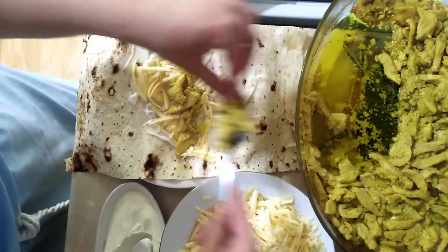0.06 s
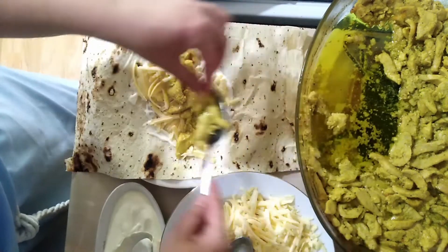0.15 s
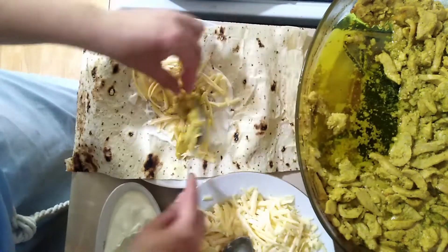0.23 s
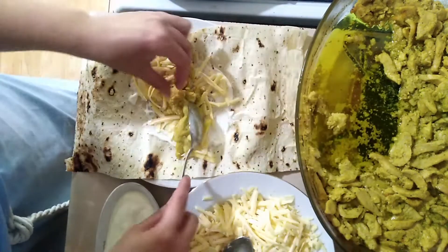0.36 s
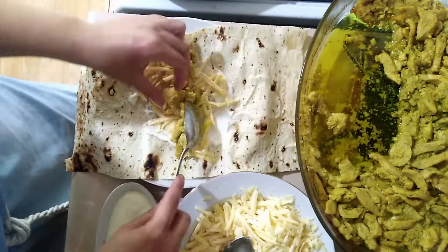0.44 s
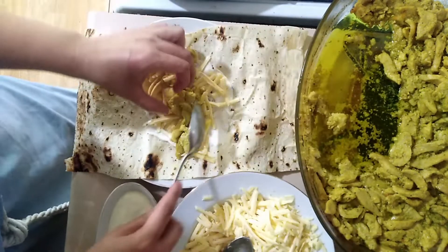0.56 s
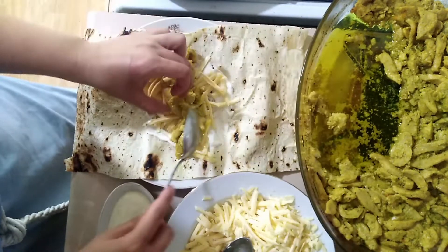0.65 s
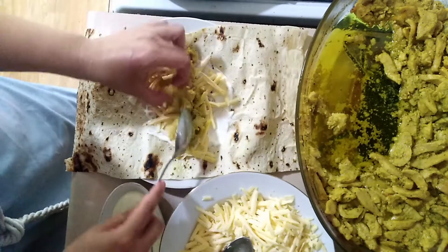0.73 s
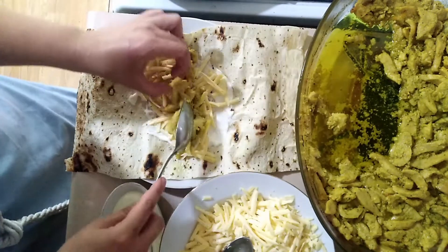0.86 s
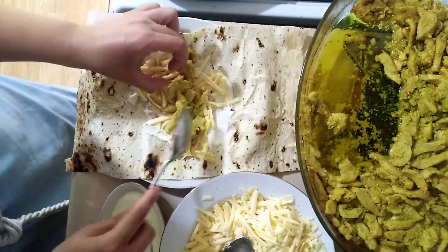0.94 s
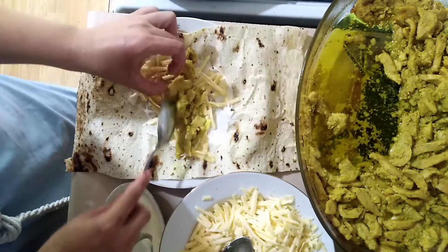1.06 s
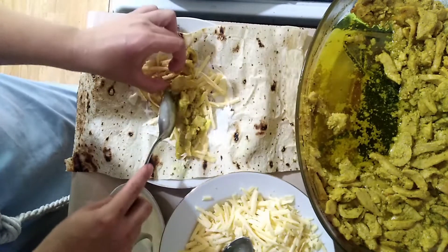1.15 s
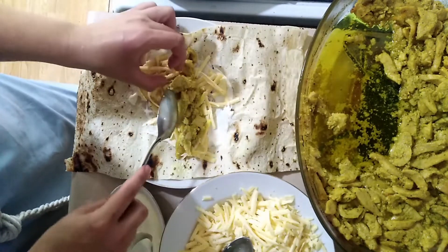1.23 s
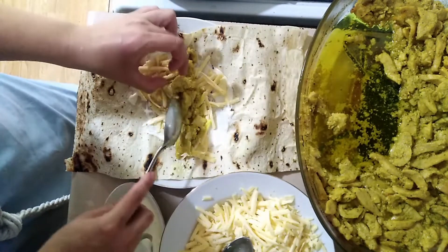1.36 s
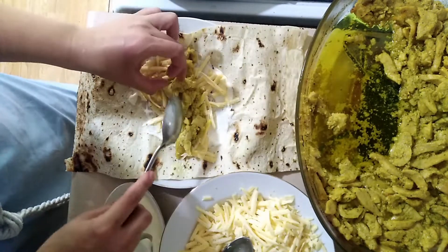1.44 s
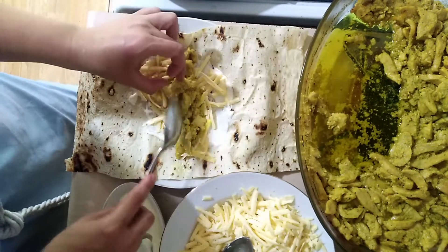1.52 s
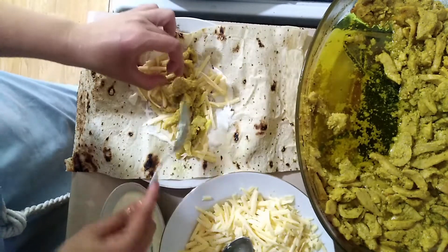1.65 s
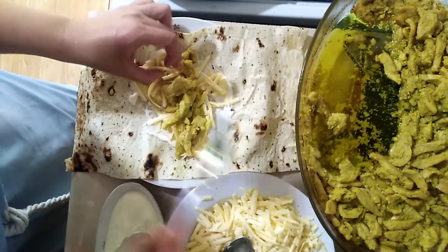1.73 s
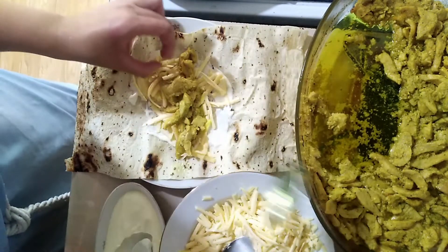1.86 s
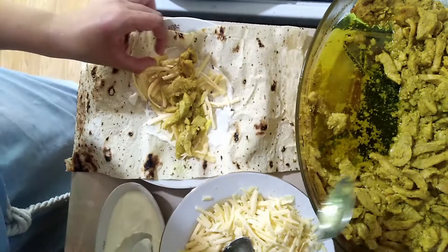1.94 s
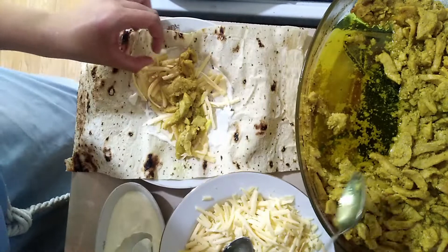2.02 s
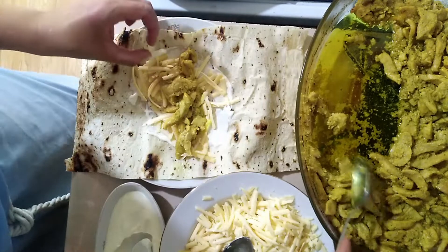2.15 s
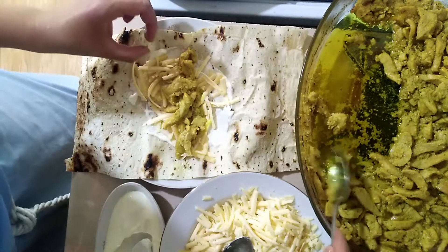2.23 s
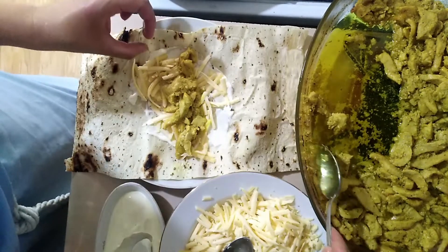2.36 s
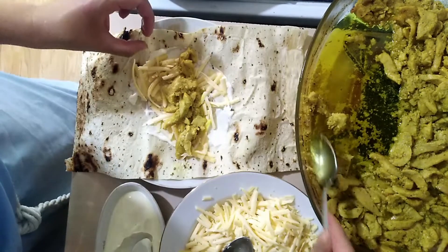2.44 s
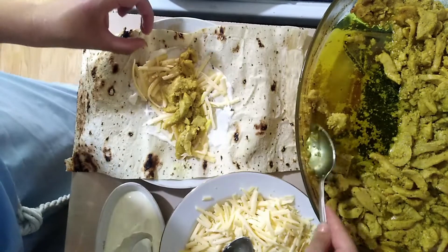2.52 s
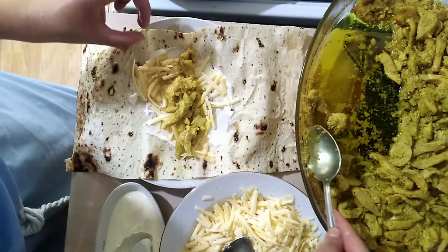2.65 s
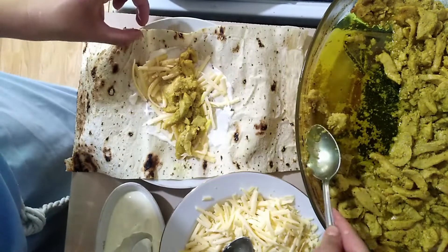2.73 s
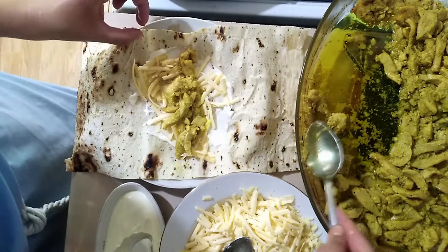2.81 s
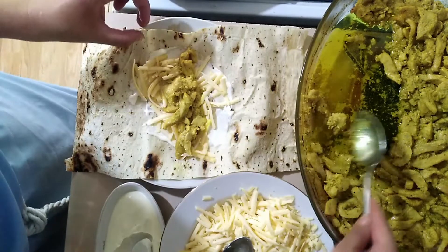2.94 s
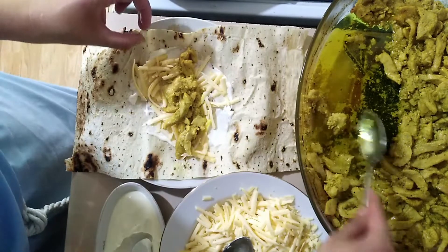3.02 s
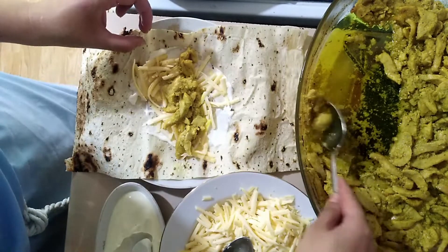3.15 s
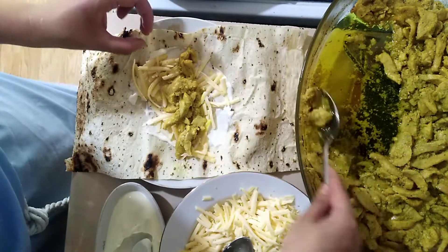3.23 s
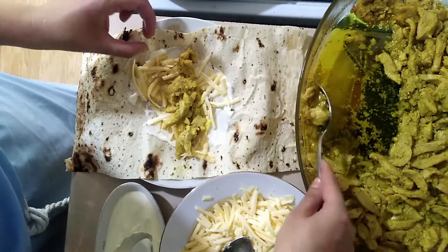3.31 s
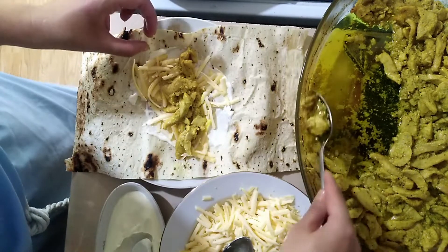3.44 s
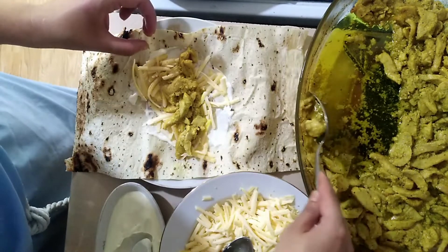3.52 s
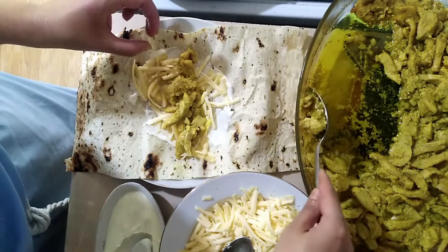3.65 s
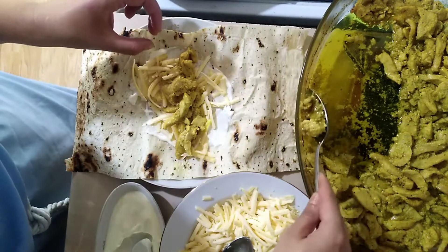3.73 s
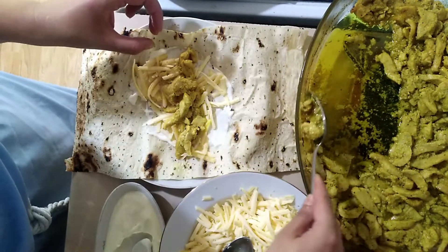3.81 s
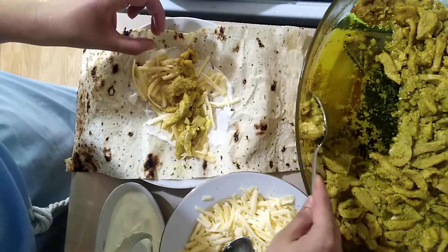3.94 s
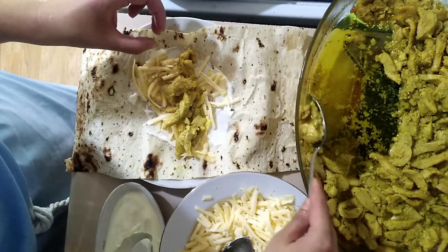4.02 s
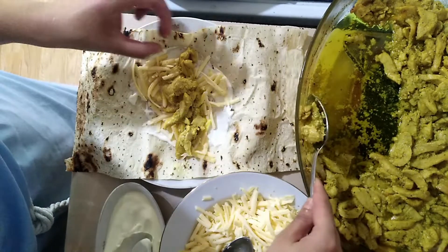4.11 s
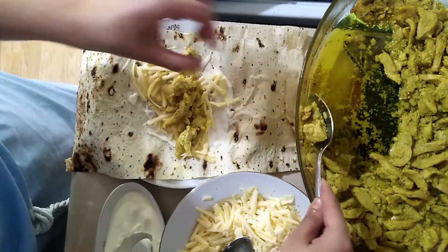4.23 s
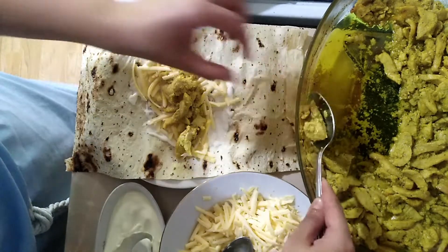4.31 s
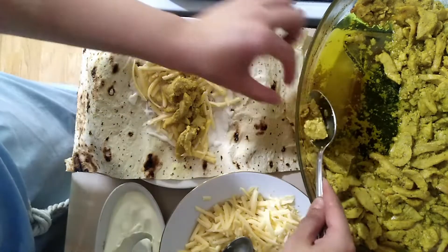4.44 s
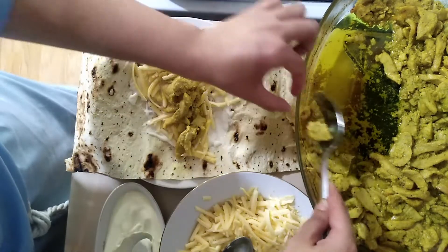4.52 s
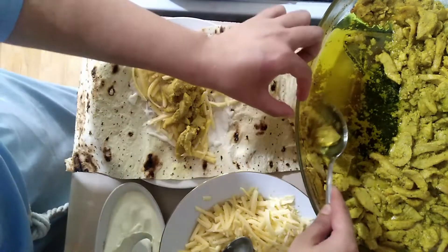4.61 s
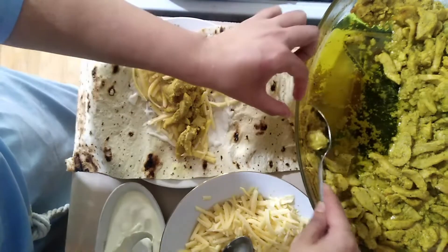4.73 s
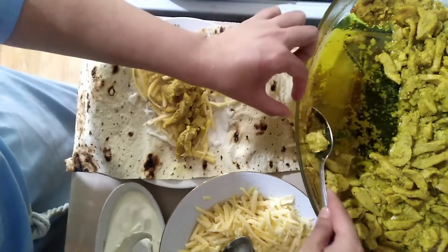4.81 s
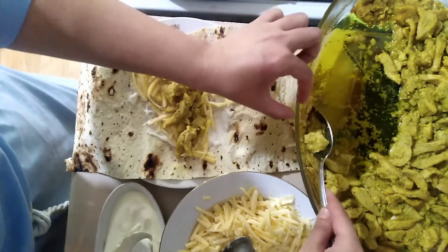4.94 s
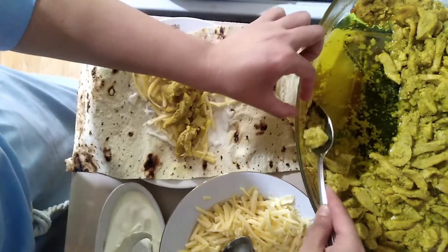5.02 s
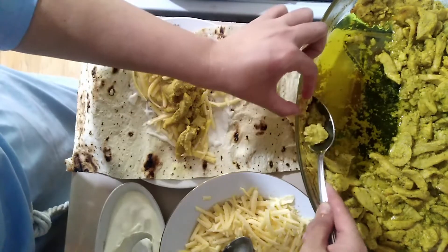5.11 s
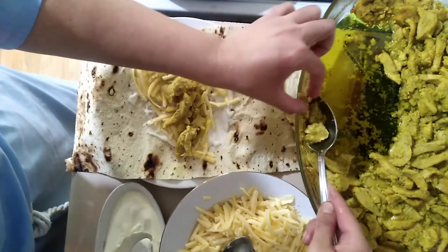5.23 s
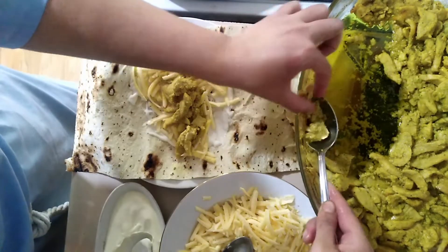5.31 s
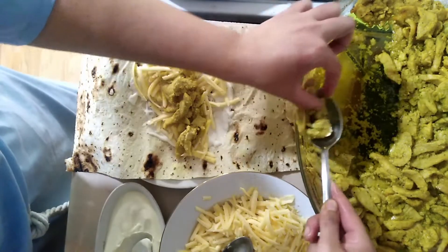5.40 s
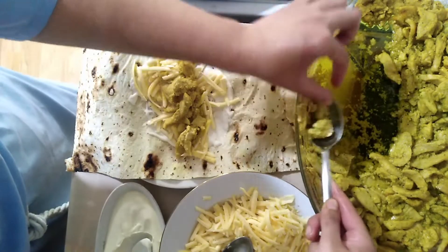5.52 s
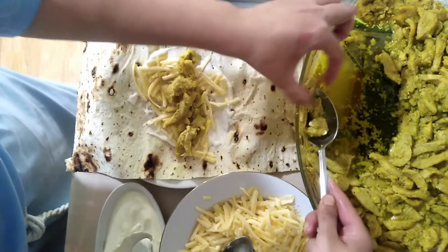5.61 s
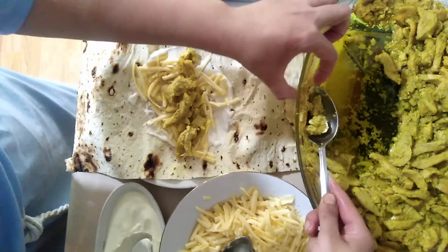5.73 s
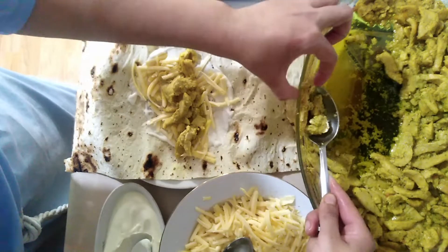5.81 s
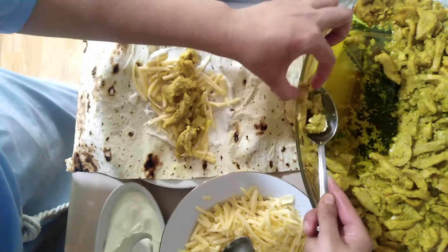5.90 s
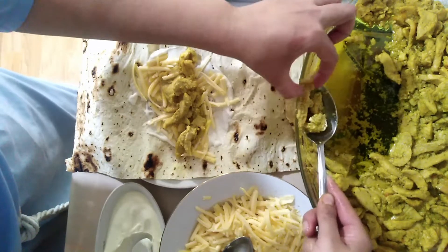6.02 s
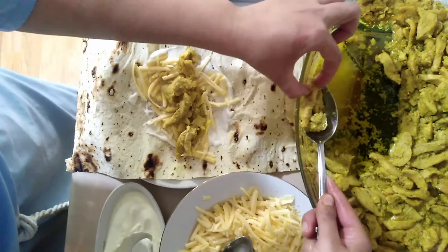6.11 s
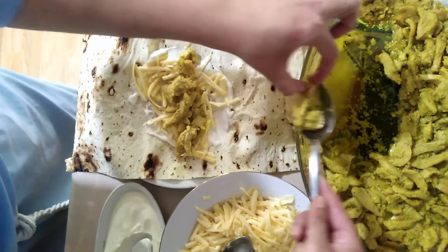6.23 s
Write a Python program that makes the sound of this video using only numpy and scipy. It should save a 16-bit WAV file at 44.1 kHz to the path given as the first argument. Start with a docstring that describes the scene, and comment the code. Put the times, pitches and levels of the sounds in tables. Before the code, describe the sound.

A close stereo scene in a small, lightly reverberant kitchen. A low, slightly fluttering appliance hum continues throughout with hollow airy drone, faint hiss and a thin high whine that comes and goes. From about 0.2 s moist filling is pressed onto flatbread: a soft bump, then wet squelches and smacks, strongest near 0.6 s with two sticky snaps, and gentler ones at 1.2 and 1.7-1.8 s. Fine wet crackle persists. At 2.5 s a steel spoon clinks clearly on a large glass bowl, ringing briefly; at 3.0 s comes a brighter, shorter clink with more spoon ring. A low bump and faint moist scooping follow from 3.3 to 4.2 s. At 4.7 s there is a dull, food-muffled contact, then at 5.0 s a dry dull tick and soft squelch. A firm clink with a thud lands at 5.5 s, and faint bumps and a muffled touch end it around 5.8 s.

```python
"""Small kitchen: a steel spoon takes filling from a large glass bowl and spreads it on flatbread.
Three clear clinks and three fainter, duller contacts ring bowl and spoon modes over a short noise clack.
Moist handling is enveloped noise: squelches, smacks, snaps and crackle, with soft bumps on the table.
An appliance hums behind in coloured noise, with a thin, wavering narrow-band whine.
Decaying octave bands of noise form the room's reverberation."""
import sys
import numpy as np
from scipy import signal
from scipy.fft import rfft, irfft, next_fast_len
from scipy.io import wavfile

SR = 44100
rng = np.random.default_rng(int(sys.argv[2]) if len(sys.argv) > 2 else 0)


def log_audio(samples):
    """Write samples as a 16-bit WAV file to the path given in sys.argv[1]."""
    # one column per channel
    frames = np.atleast_2d(samples).T
    # limit to full scale, then quantise
    limited = np.clip(frames, -1, 1)
    pcm = np.round(limited * 32767).astype(np.int16)
    wavfile.write(sys.argv[1], SR, pcm)


N = 276066
AGE_S = np.arange(SR * 3 // 5) / SR   # time since onset of an event

# appliance rumble: centre_hz, level_db_per_hz
RUMBLE = [(20, -109), (32, -104), (55, -88), (85, -83), (115, -75), (145, -75.5), (180, -86), (250, -97.5),
          (400, -118), (700, -132)]
RUMBLE_SIDE_DB, RUMBLE_LEFT_DB = -12.5, -1.7
RUMBLE_FLUTTER_DB, RUMBLE_FLUTTER_HZ = 1.7, 8.3
# air-flow resonances: centre_hz, width_hz, level_db_per_hz, left_minus_right_db, flutter_db, flutter_hz
AIR_DRONE = [(205.2, 55, -83, 12, 3.5, 11), (297.6, 20, -85, 2.5, 2.5, 5), (382, 160, -101.5, -17.5, 8, 5),
             (629.3, 58, -94, 21.5, 5, 17), (880, 35, -106, -14.5, 1, 3.1), (1101, 61, -90.5, 11, 5, 20),
             (1210, 66, -87.5, -8, 4, 12), (1379, 110, -90, -13.5, 5, 12),
             (1527.8, 77.4, -80.5, -27.5, 2, 15), (1638, 47, -87.5, -2.5, 2.5, 15),
             (1670, 120, -101, -4.5, 3, 4.1)]
# faint treble noise in bands of uneven level: columns as AIR_DRONE
TREBLE_BANDS = [(3230, 45, -114, -8.5, 4, 3), (4880, 960, -117, -1, 4.4, 11), (5770, 270, -115, 0, 5, 3),
                (7560, 220, -118, -4, 7.3, 2.4), (12800, 230, -127, -8, 4, 3)]
# even hiss: centre_hz, level_db_per_hz
HISS = [(200, -118), (900, -119), (1400, -110), (1950, -121), (2700, -121), (4200, -121.5), (6400, -127),
        (8500, -131.5), (14000, -134)]
# whine level before flutter: time_s, level_db
WHINE_LEVEL = [(0.0, -79), (0.5, -80.5), (0.88, -92), (1.06, -74), (1.5, -89.5), (1.78, -64.5), (2.3, -72),
               (2.9, -68.5), (3.45, -77.5), (3.8, -65), (4.25, -79.5), (4.8, -84.5), (5.1, -77), (5.8, -75),
               (6.26, -74.5)]
WHINE_HZ, WHINE_WIDTH_HZ = 4684, 95
WHINE_FLUTTER_DB, WHINE_FLUTTER_HZ = 4, 6.3

# kitchen reverberation: centre_hz, t60_s, level_db
ROOM = [(150, 1, -10.5), (507, .45, -9.5), (980, 0.47, -14), (2000, 0.41, -15.5), (3790, 0.47, -14),
        (8030, 0.41, -13.5), (14000, 0.09, -7.5)]
ROOM_RISE_S = 0.02
CUTOFF_HZ = 14500

# soft bumps on the table: start_s, level_db, centre_hz
THUDS = [(0.233, -44, 123), (3.250, -42, 111), (5.125, -43.5, 87), (5.522, -37.5, 127), (5.715, -43, 80)]
THUD_HALF_WIDTH_OCTAVES, THUD_RISE_S, THUD_T60_S = 0.3, 0.0055, 0.15

# crackle of moist food
SQUISH_PER_S, SQUISH_DB, SQUISH_SPREAD_DB = 24, -69.5, 6.5
SQUISH_WIDTH_HZ, SQUISH_RISE_S, SQUISH_T60_S = 260, 0.004, 0.06

# moist food pressed or lifted: start_s, squelch_db, smack_db, smack_hz, t60_s, left_minus_right_db
PRESSES = [(0.187, -51, -51.5, 2860, 0.33, 4), (0.546, -51, -56, 3760, 0.69, 8),
           (0.617, -41.5, -53, 2710, 0.38, 0), (0.746, -73, -55.5, 3950, 0.11, -2),
           (1.196, -54.5, -78, 3620, 0.37, -5), (1.660, -78, -58, 3540, .22, -14),
           (1.823, -53.5, -77, 3140, .2, -2), (3.464, -70, -65, 4340, 0.25, -8),
           (3.766, -75.5, -65, 2780, 0.16, -6), (4.195, -57.5, -63, 2960, 0.39, 7),
           (4.851, -60, -70, 3030, 0.07, 2), (5.110, -57, -68.5, 2470, 0.47, 3)]
# squelch colour, relative: centre_hz, level_db_per_hz
SQUELCH_COLOUR = [(150, -12), (400, -9.5), (640, -2), (850, -10.5), (1080, 1), (1400, -9), (1900, -27),
                  (5000, -60)]
SMACK_HALF_WIDTH_OCTAVES = 0.21
SQUELCH_RISE_PER_T60, SMACK_RISE_PER_T60 = 0.035, 0.041
GRAIN_DB, GRAIN_HZ = 2.5, 72

# wet spoon snaps free of the filling: start_s, level_db
SNAPS = [(0.545, -54), (0.616, -48.5)]
SNAP_HZ, SNAP_HALF_WIDTH_OCTAVES, SNAP_LEFT_DB = 4840, 0.36, 8
SNAP_RISE_S, SNAP_T60_S = 0.00078, 0.12

# fingertip nudges the spoon, two dead resonances: centre_hz, level_db, left_minus_right_db
FLICK = [(1440, -32, -3), (2630, -37.5, 0)]
FLICK_START_S, FLICK_HALF_WIDTH_OCTAVES = 4.962, 0.16
FLICK_RISE_S, FLICK_T60_S = 0.0039, 0.059

# spoon on glass: start_s, wall_place (0-2, beyond 2 acts as 2), bowl_db, spoon_db, clack_db, clack_t60_s,
# contact_cutoff_hz, left_minus_right_db (clack and clusters), contact_s, food_db_per_octave
CLINKS = [(2.4583, 0.0, 3, -33.5, -27.5, 0.2, 6360, 1.5, 0.0005, 0),
          (3.009, 0.65, 0.5, 3, -16.5, 0.074, 11100, 1, 0.00034, 0),
          (4.687, 1.92, -15.5, -17.5, -51.5, 0.24, 600, -9, 0.0009, 11.5),
          (4.960, 0.24, -16.5, -44, -54, 0.1, 2570, -26, 0.0074, 2.5),
          (5.5198, 2.0, 4, -19, -17, 0.086, 4500, 0, 0.0017, 0),
          (5.828, 2.5, -26.5, -65.5, -82, 0.11, 4040, -26, 0.0076, 2)]
# glass bowl modes: pitch_hz
BOWL_HZ = [442, 951, 1426, 1944, 2508, 3165, 3845, 4603, 5493, 5655, 6398, 7405, 8250, 9680, 10520, 11250,
           12300]
# the same modes: t60_s, left_minus_right_db, then level_db at wall place 0, 1, 2
BOWL_MODES = [(.09, -12, -30, -43, -21), (0.2, 0, -33.5, -27.5, -24.5), (.09, -8.5, -31.5, -20, -16.5),
              (0.17, -2, -30.5, -23.5, -22.5), (0.12, -5.5, -25, -39, -30), (0.069, -3.5, -25, -44.5, -28),
              (0.11, -3, -25.5, -40.5, -25), (0.072, -27.5, -29, -43.5, -23.5),
              (0.13, 8, -32.5, -53.5, -54), (0.13, 2, -47, -49.5, -37), (0.084, -2.5, -43, -46, -37),
              (0.098, 5.5, -48.5, -56.5, -35.5), (0.1, -1, -53, -50, -52.5),
              (0.056, -2.5, -57.5, -55, -55.5), (0.061, 0.5, -61.5, -41.5, -47), (0.048, -2, -71, -54, -51),
              (.1, -3.5, -68, -52, -55.5)]
# spoon modes, damped by the hand: pitch_hz, t60_s, left_minus_right_db, level_db, rise_s
SPOON_MODES = [(752, 0.13, -2.5, -26.5, 0.024), (818, 0.084, 2.5, -13, 0.019),
               (857, 0.089, -4, -12.5, 0.016), (1285, .05, -29, -20.5, .001),
               (1515, 0.064, -14, -13, 0.0013), (1590, 0.037, 0, -26.5, .001),
               (2077, 0.08, 7, -24.5, 0.0011), (3653, 0.037, 2, -25.5, 0.000502),
               (7005, 0.055, -0.5, -31, 0.00032), (14100, .04, -8.5, -47, .0005)]
# dense modes of bowl and table, relative: centre_hz, level_db_per_hz
CLACK_COLOUR = [(100, -29.5), (330, -26.5), (520, -1), (750, -0.5), (1100, 6.5), (1450, 11.5), (2300, -3.5),
                (2800, -3), (3800, 3.5), (5200, -6.5), (7000, -10), (9000, -15.5), (11000, -17.5),
                (14000, -26)]
LEFT_LAG_S, BOWL_RISE_CYCLES = 0.0003, 4.57
# close neighbouring modes, as a noise band around each bowl mode
CLUSTER_DB, CLUSTER_WIDTH_AT_1KHZ_HZ, CLUSTER_T60_S = -6, 150, 0.091


def from_db(db):
    """Decibels to gain."""
    return 10 ** (np.asarray(db) / 20)


def panned(left_minus_right_db):
    """Left and right gains at constant power."""
    gains = from_db(np.array([[left_minus_right_db], [-left_minus_right_db]]) / 2)
    return gains / np.sqrt(np.mean(gains ** 2))


def at_hz(points, hz, column=1):
    """Table column interpolated over log frequency."""
    points = np.array(points)
    return np.interp(np.log(hz + 1), np.log(points[:, 0]), points[:, column])


def bell(offset, width):
    """Gain of a bell curve whose power is halved at half the width."""
    return np.exp2(-np.minimum(2 * (offset / width) ** 2, 40))


def noise(colour, size=N, channels=2):
    """Gaussian noise, independent per channel, whose gain per root Hz is colour(hz)."""
    fast_size = next_fast_len(size, True)
    white = rfft(rng.standard_normal((channels, fast_size)))
    hz = np.linspace(0, SR / 2, white.shape[1])
    return irfft(white * colour(hz), fast_size)[:, :size] * np.sqrt(SR / 2)


def rms_one(x):
    """Scales to rms 1."""
    return x / np.sqrt(np.mean(x ** 2) + 1e-30)


def drift(rate_hz, size=N):
    """Low-passed noise of rms 1, half power at rate_hz, interpolated from every 32nd sample."""
    step = 32
    slow = noise(lambda hz: bell(hz / step, 2 * rate_hz), size // step + 2, channels=1)[0]
    return np.interp(np.arange(size) / step, np.arange(len(slow)), rms_one(slow))


def dying(rise_s, t60_s):
    """Envelope with exponential rise (time constant rise_s) and exponential decay."""
    rise = 1 - np.exp(-AGE_S / max(rise_s, 1e-5))
    return rise * np.exp(-np.log(1000) * AGE_S / max(t60_s, 1e-3))


def add(out, start_s, sound):
    """Mixes a sound into out at start_s."""
    start = max(round(start_s * SR), 0)
    out[:, start:start + sound.shape[1]] += sound[:, :N - start]


def puff(centre_hz, half_width_octaves):
    """Short band of noise around one pitch, at rms 1."""
    def colour(hz):
        return bell(np.log2((hz + 1) / centre_hz), 2 * half_width_octaves)
    return rms_one(noise(colour, size=len(AGE_S)))


def fluttering_bands(bands):
    """Noise bands of randomly varying level, each with its own balance between the sides."""
    out = 0
    for centre_hz, width_hz, level_db, left_db, flutter_db, flutter_hz in bands:
        band = noise(lambda hz: bell(hz - centre_hz, width_hz))
        out = out + panned(left_db) * band * from_db(level_db + flutter_db * drift(flutter_hz))
    return out


def rumble():
    """Low noise, mostly common to both sides, with a fluttering level."""
    mid, side = noise(lambda hz: from_db(at_hz(RUMBLE, hz)))
    stereo = mid + from_db(RUMBLE_SIDE_DB) * side * [[1], [-1]]
    return stereo * panned(RUMBLE_LEFT_DB) * from_db(RUMBLE_FLUTTER_DB * drift(RUMBLE_FLUTTER_HZ))


def whine():
    """Narrow-band noise that follows a level curve plus random flutter."""
    level_db = np.interp(np.arange(N) / SR, *np.transpose(WHINE_LEVEL))
    level_db = level_db + WHINE_FLUTTER_DB * drift(WHINE_FLUTTER_HZ)
    return from_db(level_db) * rms_one(noise(lambda hz: bell(hz - WHINE_HZ, WHINE_WIDTH_HZ)))


def background():
    """Appliance rumble, hollow air drone and wavering whine, with faint treble noise and even hiss."""
    # standing waves make each drone resonance louder on one side
    drone = fluttering_bands(AIR_DRONE)
    treble = fluttering_bands(TREBLE_BANDS)
    hiss = noise(lambda hz: from_db(at_hz(HISS, hz)))
    return rumble() + drone + treble + hiss + whine()


def kitchen(x):
    """Diffuse reflections: convolution with octave bands of noise, each with its own decay."""
    response = 0
    for centre_hz in 125 * 2 ** np.arange(8):
        band = noise(lambda hz: bell(np.log2((hz + 1) / centre_hz), 1), size=len(AGE_S))
        band = band / np.sqrt(SR / 2)
        tail = dying(ROOM_RISE_S, at_hz(ROOM, centre_hz))
        tail = tail / np.linalg.norm(tail)
        response = response + from_db(at_hz(ROOM, centre_hz, column=2)) * band * tail
    return signal.fftconvolve(x, response, axes=1)[:, :N]


def thuds():
    """Low bumps, whose long waves reach both sides alike."""
    out = np.zeros((2, N))
    for start_s, level_db, centre_hz in THUDS:
        mono = rms_one(puff(centre_hz, THUD_HALF_WIDTH_OCTAVES)[:1])
        add(out, start_s, from_db(level_db) * mono * dying(THUD_RISE_S, THUD_T60_S))
    return out


def squishes():
    """Tiny wet pockets open at random, each with its own pitch; higher ones are fainter on average."""
    out = np.zeros((2, N))
    envelope = dying(SQUISH_RISE_S, SQUISH_T60_S)[:SR // 8]
    chances = rng.random((300, 4))
    for when, pitch, size, side in chances[:int(SQUISH_PER_S * N / SR)]:
        centre_hz = 2200 * 3.6 ** pitch
        pop = rms_one(noise(lambda hz: bell(hz - centre_hz, SQUISH_WIDTH_HZ), size=len(envelope)))
        level_db = SQUISH_DB + SQUISH_SPREAD_DB * (2 * size - 1) - 4 * pitch
        left_db = 6 * (2 * side - 1)
        add(out, when * (N - 1) / SR, from_db(level_db) * panned(left_db) * pop * envelope)
    return out


def sticky(x):
    """Food sticks and lets go: fast random level changes break a sound into grains."""
    return rms_one(x * from_db(GRAIN_DB * drift(GRAIN_HZ, len(AGE_S))))


def presses():
    """Each press gives a wet smack and a lower squelch; long presses also swell more slowly."""
    out = np.zeros((2, N))
    for start_s, squelch_db, smack_db, smack_hz, t60_s, left_db in PRESSES:
        squelch = sticky(noise(lambda hz: from_db(at_hz(SQUELCH_COLOUR, hz)), size=len(AGE_S)))
        squelch = squelch * dying(SQUELCH_RISE_PER_T60 * t60_s, t60_s)
        smack = sticky(puff(smack_hz, SMACK_HALF_WIDTH_OCTAVES))
        smack = smack * dying(SMACK_RISE_PER_T60 * t60_s, t60_s)
        add(out, start_s, panned(left_db) * (from_db(squelch_db) * squelch + from_db(smack_db) * smack))
    return out


def snaps():
    """Brief bright ticks of grainy noise as the spoon comes unstuck."""
    out = np.zeros((2, N))
    for start_s, level_db in SNAPS:
        snap = sticky(puff(SNAP_HZ, SNAP_HALF_WIDTH_OCTAVES)) * dying(SNAP_RISE_S, SNAP_T60_S)
        add(out, start_s, from_db(level_db) * panned(SNAP_LEFT_DB) * snap)
    return out


def flick():
    """One dull tick: two noise bands that hardly ring."""
    out = np.zeros((2, N))
    for centre_hz, level_db, left_db in FLICK:
        tick = puff(centre_hz, FLICK_HALF_WIDTH_OCTAVES) * dying(FLICK_RISE_S, FLICK_T60_S)
        add(out, FLICK_START_S, from_db(level_db) * panned(left_db) * tick)
    return out


def muffled_db(hz, db_per_octave):
    """Food between spoon and glass takes more from the higher modes."""
    return db_per_octave * np.log2(hz / BOWL_HZ[0])


def mode(hz, t60_s, left_db, rise_s):
    """One ringing mode; the bowl stands on the right, so the left sine lags."""
    lagged_s = AGE_S - np.array([[LEFT_LAG_S], [0]])
    phase = 2 * np.pi * (hz * lagged_s + rng.random())
    return panned(left_db) * np.sin(phase) * dying(rise_s, t60_s)


def cluster(centre_hz, left_db, rise_s):
    """Close neighbouring modes, as a noise band around a bowl mode."""
    width_hz = CLUSTER_WIDTH_AT_1KHZ_HZ * np.sqrt(centre_hz / 1000)
    band = rms_one(noise(lambda hz: bell(hz - centre_hz, width_hz), size=len(AGE_S)))
    return from_db(CLUSTER_DB) * panned(left_db) * band * dying(rise_s, CLUSTER_T60_S)


def clack(cutoff_hz):
    """Noise for the dense modes; a contact cushioned by food has less treble."""
    def colour(hz):
        return from_db(at_hz(CLACK_COLOUR, hz)) / np.hypot(1, (hz / cutoff_hz) ** 2)
    return rms_one(noise(colour, size=len(AGE_S)))


def clinks():
    """Each contact rings bowl and spoon over a clack; the place on the wall sets the bowl mode levels."""
    out = np.zeros((2, N))
    for (start_s, place, bowl_db, spoon_db, clack_db, clack_t60_s,
         cutoff_hz, left_db, contact_s, food_db) in CLINKS:
        for hz, (t60_s, mode_left_db, *place_db) in zip(BOWL_HZ, BOWL_MODES):
            level_db = bowl_db + np.interp(place, np.arange(3), place_db) - muffled_db(hz, food_db)
            rise_s = max(BOWL_RISE_CYCLES / hz, contact_s)
            ring = mode(hz, t60_s, mode_left_db, rise_s) + cluster(hz, left_db, rise_s)
            add(out, start_s, from_db(level_db) * ring)
        for hz, t60_s, mode_left_db, mode_db, rise_s in SPOON_MODES:
            level_db = spoon_db + mode_db - muffled_db(hz, food_db)
            ring = mode(hz, t60_s, mode_left_db, max(rise_s, contact_s))
            add(out, start_s, from_db(level_db) * ring)
        burst = clack(cutoff_hz) * dying(contact_s, clack_t60_s)
        add(out, start_s, from_db(clack_db) * panned(left_db) * burst)
    return out


def scene():
    """Close sounds on the table, their reverberation and the background."""
    table = clinks() + presses() + snaps() + thuds() + flick() + squishes()
    return table + kitchen(table) + background()


def record(dry):
    """Steep low-pass at CUTOFF_HZ."""
    return signal.sosfilt(signal.ellip(10, 0.1, 80, CUTOFF_HZ, fs=SR, output="sos"), dry)


dry = scene()
out = record(dry)
log_audio(out)
```